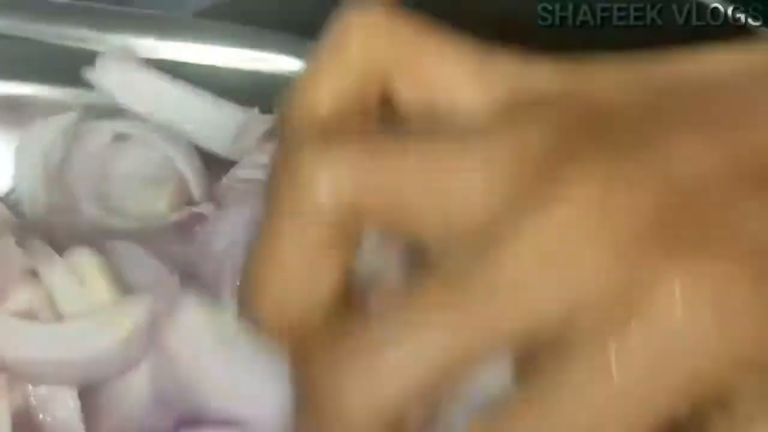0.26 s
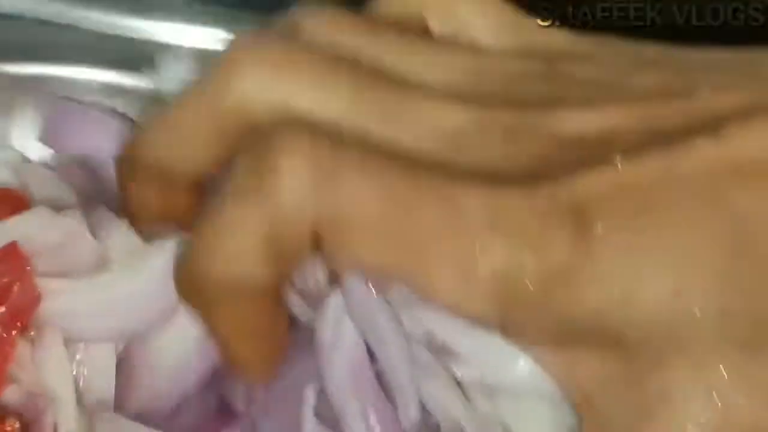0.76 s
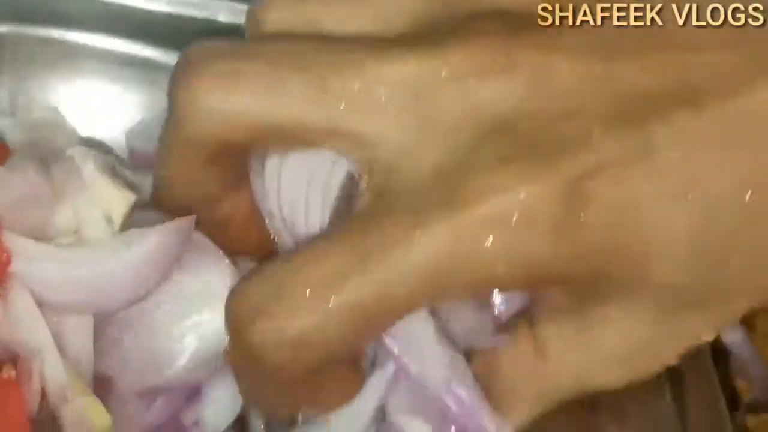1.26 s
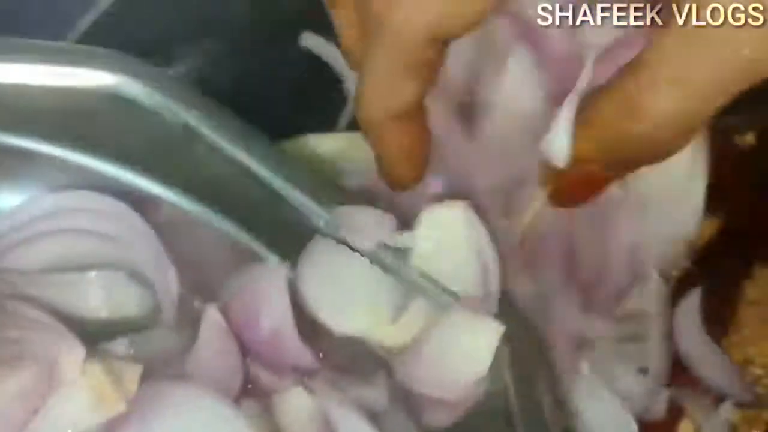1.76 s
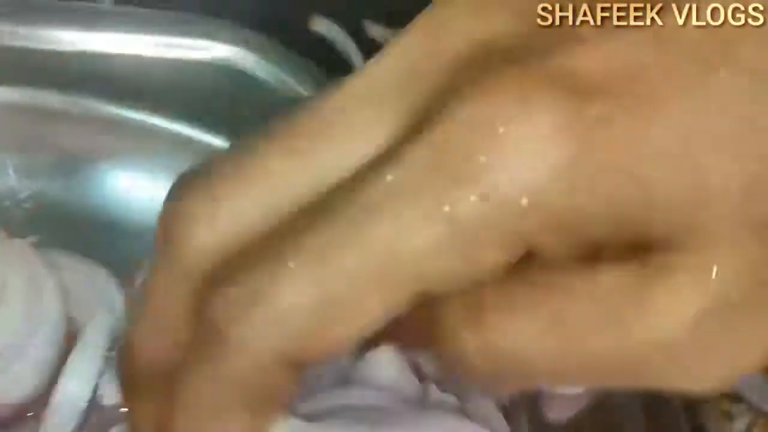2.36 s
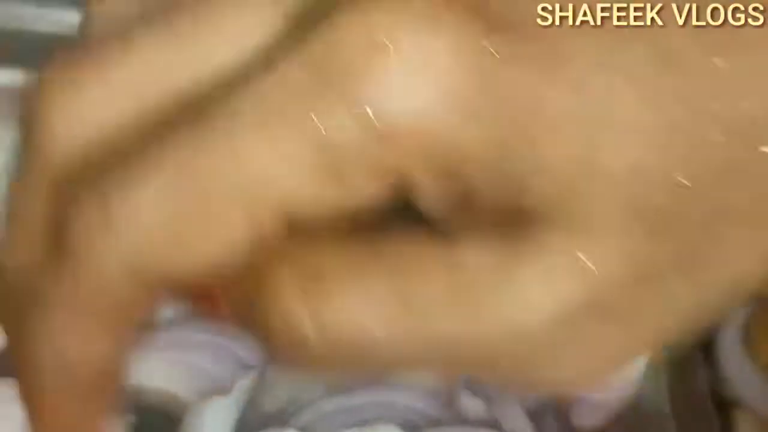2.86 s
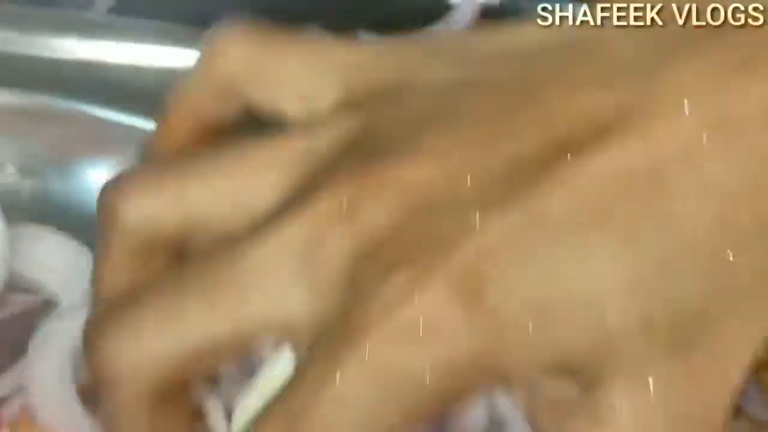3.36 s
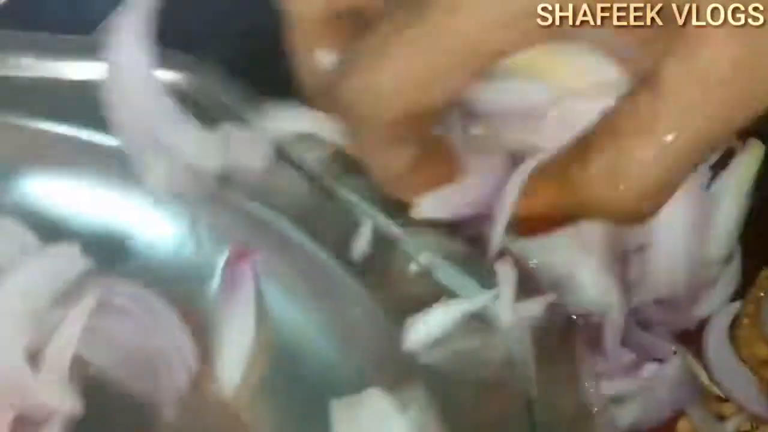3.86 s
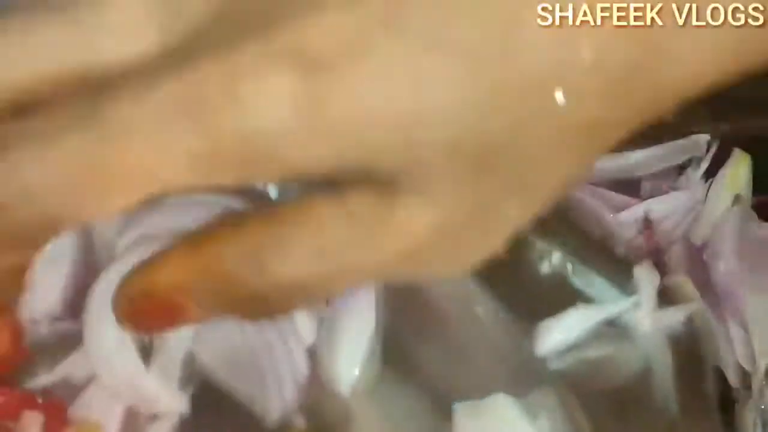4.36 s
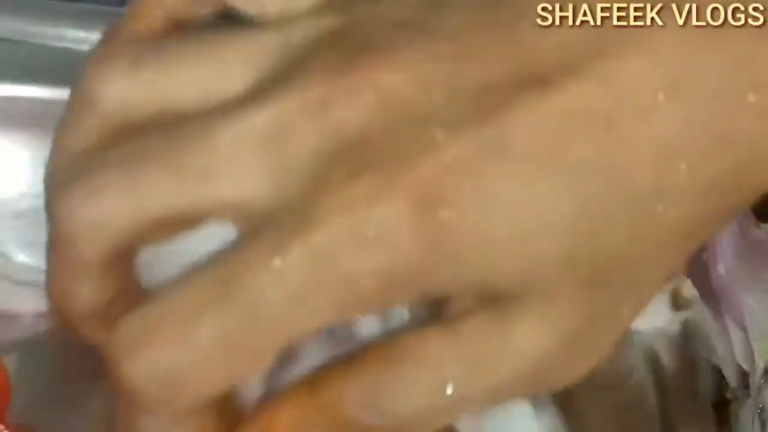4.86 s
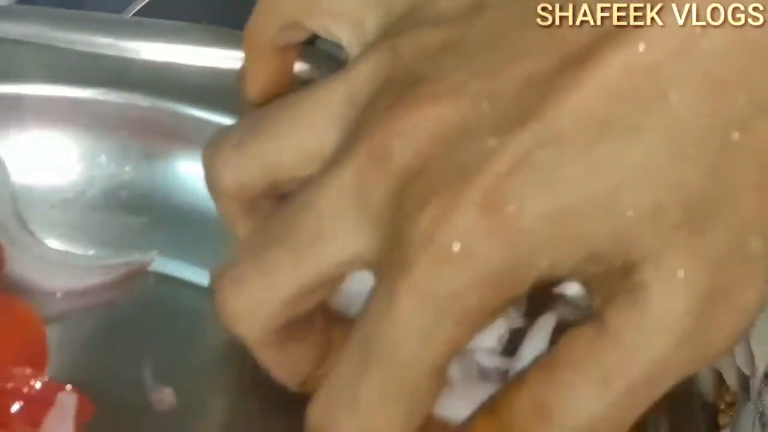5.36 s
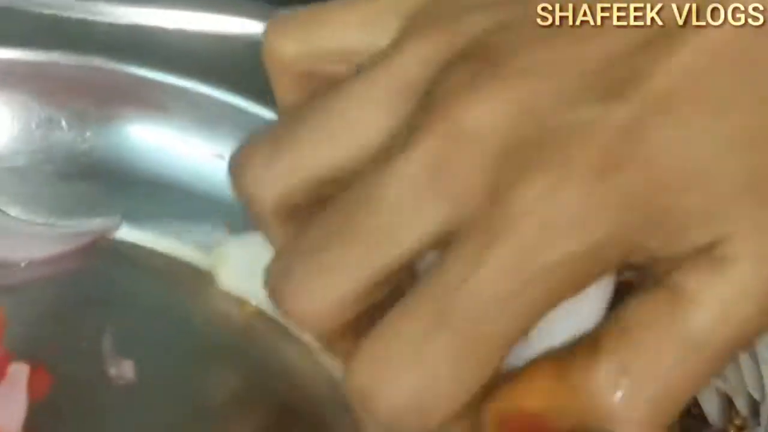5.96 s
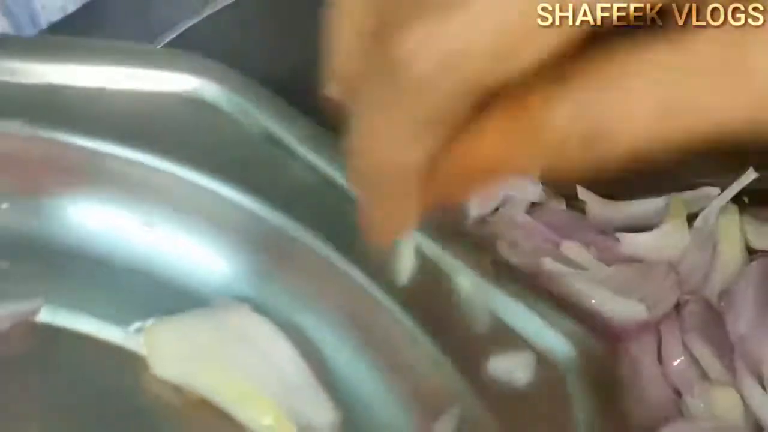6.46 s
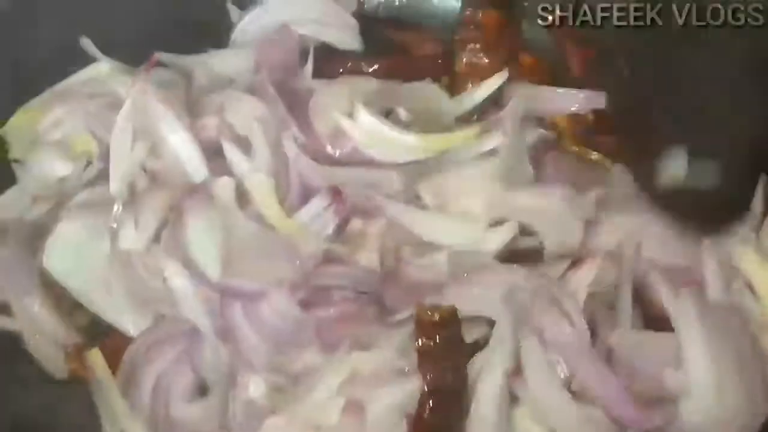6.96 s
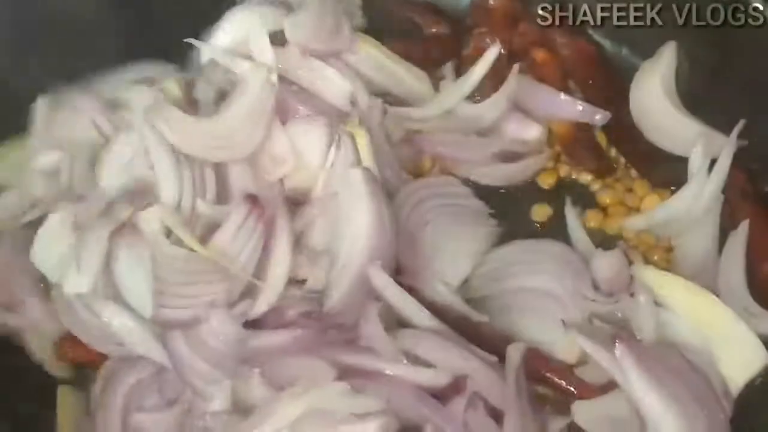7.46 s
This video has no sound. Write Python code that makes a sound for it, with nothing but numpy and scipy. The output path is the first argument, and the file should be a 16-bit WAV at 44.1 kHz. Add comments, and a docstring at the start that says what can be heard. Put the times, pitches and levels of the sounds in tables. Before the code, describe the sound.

Freshly sliced wet onions sizzle loudly in hot oil, crackling, spitting and popping close by, swelling with handfuls and ending with a knock on the microphone.

```python
"""Sliced onions fry in hot oil in a steel pan, close to a two-port microphone, in a small kitchen.
From the start steam bubbles fizz, crackle and burble, wet slices spit and pop, and a faint hum soon fades out.
The frying swells with each handful, and dull thuds come from the tray where a hand gathers slices.
Near the end the microphone moves in over the pan: rumble and a drone rise and the sizzle leans left.
The last slices land and seethe; then a finger knocks the right port and the sizzle briefly dips."""
import sys
import numpy as np
from scipy import signal
from scipy.fft import rfft, irfft, next_fast_len
from scipy.io import wavfile

SR = 44100
rng = np.random.default_rng(int(sys.argv[2]) if len(sys.argv) > 2 else 0)


def inscribe(sig):
    """Save sig as 16-bit PCM at rate SR to the path in sys.argv[1].

    A 1-D sig is mono; a 2-D sig holds one channel per row.
    Samples are clipped to [-1, 1] before scaling.
    """
    pcm = np.round(np.clip(np.atleast_2d(sig).T, -1, 1) * 32767)
    wavfile.write(sys.argv[1], SR, pcm.astype(np.int16))


N = 339481
TIME = np.arange(N) / SR
CUTOFF_HZ = 15470   # top of the microphone's range


# The frying in the pan, swelling with each handful and cooling between; each layer adds its own trim.
# Each row: time in seconds, fizz level in dB, crackle level in dB, bubbling level in dB.
FRYING_LEVELS = [(0.0, -18.5, -23.5, -34), (0.1, -19, -24.5, -35.5), (0.22, -18.5, -23, -35),
                 (0.47, -19.5, -26, -38.5), (0.76, -19, -24.5, -36.5), (0.89, -22, -28, -39.5),
                 (1.3, -21.5, -26.5, -37), (1.9, -22.5, -29.5, -41.5), (2.35, -22, -26.5, -37.5),
                 (2.7, -20.5, -25, -38), (2.9, -22.5, -27, -36), (3.22, -22, -24.5, -36),
                 (3.36, -23.5, -25, -37.5), (3.56, -24, -26, -36), (3.84, -23, -27.5, -37.5),
                 (3.98, -22.5, -24.5, -36), (4.3, -22.5, -24.5, -36.5), (4.47, -25.5, -24.5, -36),
                 (4.52, -24.5, -25, -37.5), (4.74, -19.5, -22.5, -34), (4.85, -23.5, -25, -35.5),
                 (5.15, -21, -23, -35.5), (5.3, -23.5, -26, -35.5), (5.5, -20, -23.5, -34),
                 (5.69, -21.5, -24, -34), (5.76, -24, -27, -35), (5.86, -21, -24.5, -35),
                 (6.17, -23.5, -26.5, -37), (6.42, -21.5, -24.5, -35), (6.57, -24, -27, -36),
                 (6.76, -24, -25, -36.5), (6.82, -20.5, -25, -39), (7.05, -19, -21.5, -34),
                 (7.28, -19, -23.5, -36.5), (7.42, -17, -21, -34), (7.7, -18, -22, -32)]


def sizzle():
    """Small bubbles fizz, middling ones crackle, large ones burble; flurries stir the large ones least."""
    fizz_db, crackle_db, bubbling_db = in_time(FRYING_LEVELS)
    activity = flurries(per_s=140, spread_db=2.5, fade_s=.004, depth=.45)
    # slower surges as wet slices settle
    activity = activity * flurries(per_s=16, spread_db=0.76, fade_s=.04, depth=.3)
    fizz = bursts(activity, low_hz=4010, high_hz=17300, per_s=8000, spread_db=3.5,
                  damping=0.36, echo_db=-2, haze_db=-3.5, alike=0)
    crackle = bursts(activity, low_hz=1320, high_hz=4940, per_s=3000, spread_db=2.5,
                     damping=0.53, echo_db=-2.5, haze_db=-7.0, alike=0)
    bubbling = bursts(np.sqrt(activity), low_hz=152, high_hz=1455, per_s=1100, spread_db=3.5,
                      damping=1.37, echo_db=-5.5, haze_db=-4.0, alike=0.34)
    fizz = from_db(fizz_db - 0.5) * fizz
    crackle = from_db(crackle_db - 0.58) * crackle
    return fizz + crackle + from_db(bubbling_db + 2.0) * bubbling


def bursts(activity, low_hz, high_hz, per_s, spread_db, damping, echo_db, haze_db, alike, count=7):
    """Bubbles of one size class ring a few cycles each, over a haze of countless tiny ones; rms 1."""
    grains = 0
    for hz in np.geomspace(low_hz, min(high_hz, CUTOFF_HZ), count):
        births = rms_one(clicks(activity * per_s / count, spread_db))
        grains = grains + new_spots(resonance(births, hz, damping * hz), echo_db)
    # alike is the share of haze power common to both ports
    alike = np.clip(alike, 0, 1)
    shared = np.sqrt(alike) * rng.standard_normal(N)
    haze = shared + np.sqrt(1 - alike) * rng.standard_normal((2, N))
    haze = np.sqrt(activity) * rms_one(band(haze, low_hz, high_hz))
    grains = rms_one(band(grains, low_hz, high_hz))
    return rms_one(pan_and_ports(grains + from_db(haze_db) * haze))


def flurries(per_s, spread_db, fade_s, depth, limit=5):
    """Droplets flash to steam: activity jumps, up to a limit, and dies away again; mean near 1."""
    kicks = fading(np.abs(clicks(per_s, spread_db)), fade_s)
    surge = limit * np.tanh(kicks / kicks.mean() / limit)
    return (1 + depth * surge) / (1 + depth)


def last_handful(level_db):
    """The last wet slices hit the oil and seethe in a dense, fierce crackle of small bubbles."""
    landing_s, landing_takes_s = 6.775, .03
    fizz_db = in_time(FRYING_LEVELS)[0]
    activity = flurries(per_s=200, spread_db=2, fade_s=.003, depth=.5)
    seethe = bursts(activity, low_hz=5460, high_hz=9400, per_s=2500, spread_db=3,
                    damping=0.19, echo_db=-5, haze_db=-8, alike=0, count=4)
    return ramp(landing_s, landing_takes_s) * from_db(fizz_db + level_db) * seethe


# Water meeting the oil at spots about the pan; the levels are relative, before spits() trims them.
# Each row: start in seconds, treble level in dB, body level in dB, opening crack over the spray in dB.
SPIT_EVENTS = [(0.076, -25, -27, 1), (0.2474, -35, -21, 3), (0.301, -28, -28, 2), (0.357, -26, -30, 0),
               (0.5282, -25.5, -30, 3), (0.631, -27, -33, 2), (0.7158, -25, -28, 2), (0.733, -26, -31, 2),
               (0.818, -28, -33, 2), (0.9327, -24.5, -30, -1), (1.034, -29, -31, 2), (1.089, -27.5, -26, 3),
               (1.2053, -28.5, -28, 4), (1.242, -27.5, -38, 6), (1.291, -29.5, -38, 1),
               (1.3618, -29, -37, 3), (1.456, -34, -32, 1), (1.491, -29, -28, 4), (1.62, -28.5, -42, 0),
               (1.785, -39, -35, 4), (1.9904, -28, -35, 5), (2.121, -33, -31, 0), (2.266, -39, -28, 0),
               (2.5192, -24.5, -28, 6), (2.5733, -25.5, -38, 0), (2.6853, -30, -25, 3),
               (2.9263, -24, -29, 8), (3.168, -31, -26, 4), (3.186, -28, -36, 0), (3.2307, -23, -30, 1),
               (3.740, -27, -27.5, -2), (3.9404, -26, -31, 3), (4.0796, -26.5, -33, 6),
               (4.1051, -26, -27, 3), (4.1822, -30, -34, 8), (4.246, -29, -33, 3), (4.458, -27.5, -34, 6),
               (4.476, -33, -27.5, -1), (4.575, -23.5, -28, 0), (4.6553, -27, -29, -7),
               (4.778, -25, -29, 12), (4.9082, -29, -26, 8), (5.015, -32, -38, 5), (5.168, -30, -31, 0),
               (5.2318, -28, -28, 4), (5.3598, -29, -30, 8), (5.4271, -28, -32, 1), (5.506, -27.5, -24, 2),
               (5.700, -25, -30, 4), (5.7722, -26.5, -31, 10), (5.8608, -29.5, -37, 10),
               (6.0896, -27, -32, 3), (6.264, -30, -30, 4), (6.348, -27, -35, 0), (6.5152, -25, -36, 7),
               (6.5989, -26.5, -26, -1), (6.727, -38, -32, 6), (6.7802, -23, -26, -3),
               (6.8064, -24, -33, 6), (7.3637, -30, -30, -2), (7.4232, -25, -34, 0)]


def spits(treble_db, body_db, crack_db, crack_s, grain_db, echo_db):
    """A sharp crack, then a spray of tiny bursts that holds briefly and dies."""
    hold_s, t60_s = 0.016, .09
    out, t = np.zeros((2, N)), TIME[:SR // 4]
    fade = from_db(-60 * np.maximum(t - hold_s, 0) / t60_s)
    for s, high_db, low_db, snap_db in SPIT_EVENTS:
        sizes = from_db(grain_db * rng.standard_normal(len(t)))
        grains = rms_one(rng.standard_normal(len(t)) * sizes)
        crack = from_db(snap_db + crack_db) * np.exp(-(t / crack_s) ** 2)
        spray = grains * (fade + crack)
        treble = from_db(high_db + treble_db) * band(spray, 3500, 9700, order=1)
        body = from_db(low_db + body_db) * band(spray, 830, 4300, order=3)
        add(out, s, from_spot(treble + body, echo_db))
    return pan_and_ports(out)


# Echoes of a pop off the nearby pan walls. Each row: delay in seconds, level in dB against the pop.
POP_WALL_ECHOES = [(.0022, -7), (.0038, -2.5)]
# Single large bubbles about the pan, before the level trim, the pan's path and its resonances.
# Each row: start in seconds, peak level in dB, pitch in Hz.
POP_EVENTS = [(0.2485, -11, 1300), (1.291, -18, 1000), (1.517, -19, 1000), (1.961, -19, 1200),
              (2.927, -17, 1100), (3.273, -9.5, 1500), (3.409, -19, 850), (3.517, -8.5, 1520),
              (3.741, -16, 1300), (3.9412, -13, 1700), (3.974, -16, 1200), (4.246, -15, 1100),
              (4.476, -15, 1200), (4.7782, -9.5, 1700), (5.17, -14, 1990), (5.231, -15, 1510),
              (5.634, -17, 1100), (5.731, -14.5, 1500), (5.7722, -14, 1500), (6.092, -15, 1400),
              (6.374, -14.5, 1200), (6.427, -14.5, 1200), (6.7269, -9, 1660), (7.335, -15, 1100)]


def pops(level_db, damping, echo_db):
    """A large bubble collapses in one hollow, quickly damped swing, thrown back by the walls of the pan."""
    out, collapse = np.zeros((2, N)), signal.unit_impulse(SR // 20)
    for delay_s, db in POP_WALL_ECHOES:
        collapse[int(delay_s * SR)] += from_db(db)
    for s, peak_db, hz in POP_EVENTS:
        note = band(resonance(collapse, hz, damping * hz), 616, 2500, order=3)
        note = from_db(peak_db + level_db) * note / np.abs(note).max()
        add(out, s, from_spot(note, echo_db))
    return lift(out, PAN_MODES)


def plips(level_db, per_s, spread_db, damping, count=4):
    """Larger bubbles burst singly near the microphone, more strongly as the bubbling grows."""
    bubbling_db = in_time(FRYING_LEVELS)[2]
    out = 0
    for hz in np.geomspace(1000, 1800, count):
        bubbles = resonance(clicks(per_s / count, spread_db), hz, damping * hz)
        out = out + new_spots(bubbles, echo_db=-10.0)
    return from_db(bubbling_db + level_db) * rms_one(lift(band(out, 750, 2700), PAN_MODES))


def ticks(level_db, per_s, spread_db, fade_s, echo_db):
    """Thin films of oil tear on top of the slices: dry, sharp little crackles, some bright and some dull."""
    fizz_db, crackle_db, _ = in_time(FRYING_LEVELS)
    out = 0
    for db, low_hz, high_hz in (fizz_db - 3.5, 3200, 15000), (crackle_db + 1, 1100, 6000):
        tears = fading(np.abs(clicks(per_s, spread_db)), fade_s)
        snaps = band(np.tanh(tears / 3) * rng.standard_normal(N), low_hz, high_hz, order=1)
        out = out + from_db(db + level_db) * rms_one(pan_and_ports(new_spots(snaps, echo_db)))
    return out


# Colour of the frying oil heard close by. Each row: frequency in Hz, level in dB per Hz.
OIL_COLOUR = [(60, -35), (150, -27.5), (280, -13), (450, -13), (650, -10.5), (1050, -7), (2000, 0.9),
              (2800, 1.5), (4000, -3.5), (4700, -8), (5400, -8.5), (6300, -9), (10500, -6), (14300, -5.5),
              (15400, -2.5)]
# Resonances of the steel pan. Each row: frequency in Hz, width in Hz, lift in dB.
PAN_MODES = [(345, 33, 5), (564, 42, 6.5), (625, 6.5, 9), (677, 26, 9), (813, 4.8, 9), (900, 23, 6),
             (1321, 21, 6), (1695, 23, 2), (1964, 100, 3.5), (2890, 48, 0)]
# Ringing of the microphone ports, left then right. Each row: frequency in Hz, width in Hz, lift in dB.
PORT_MODES = [(6730, 1700, 6.5), (7470, 1520, 12)]
# Shading between the two ports. Each row: frequency in Hz, left minus right in dB.
PORT_SHADING = [(100, 7), (700, -5), (1300, -4.5), (2000, 1.5), (4000, -2), (5500, 2.5), (8800, 0),
                (11500, 1.5), (13500, -1.5), (15400, 5.5)]


def pan_and_ports(x):
    """Bursts take the colour of the oil, ring the pan and then the ports."""
    x = lift(colour(x, OIL_COLOUR), PAN_MODES)
    ports = zip(x, PORT_MODES, (.5, -.5))
    return np.array([colour(lift(one, [mode]), PORT_SHADING, share) for one, mode, share in ports])


def paths(echo_db, count=2400):
    """From one spot in the pan to both ports: direct sound, quick echoes off the pan wall, then the kitchen."""
    port_lag_s = .00031
    rays = [(np.array([0.]), np.array([1.]))]
    # pan wall, then kitchen: 60 dB decay time in s, level in dB, number of echoes
    for t60, db, number in (.025, 0.5, count // 8), (.25, 1.5, count):
        delay = rng.random(number) * t60
        gain = rng.standard_normal(number) * from_db(-60 * delay / t60)
        rays.append((delay, from_db(db + echo_db) * gain / np.linalg.norm(gain)))
    delay, gain = np.hstack(rays)
    # every ray comes from its own direction, so the ports agree only in the bass
    lag = rng.uniform(-.5, .5, len(delay)) * port_lag_s
    arrivals = [((delay + port_lag_s / 2 + side * lag) * SR).astype(int) for side in (1, -1)]
    responses = [np.bincount(at, gain, SR)[:SR // 4] for at in arrivals]
    return np.array(responses) / np.linalg.norm(gain)


def from_spot(x, echo_db=0):
    """A sound made at one random spot in the pan, in stereo; lower echo_db sounds nearer."""
    return signal.fftconvolve(x[None], paths(echo_db), axes=1)[:, :N]


def new_spots(x, echo_db, count=12):
    """Bubbles rise at ever new spots: each of twelve equal stretches of time gets a new random path."""
    out = np.zeros((2, N))
    for at in np.array_split(np.arange(N), count):
        add(out, at[0] / SR, from_spot(x[at], echo_db))
    return out


def knock(level_db, hz, width_hz, tick_db, tick_hz, snap_db, snap_hz):
    """A finger bumps the right port: a tick in the case, a snap and one dead swing of pressure."""
    knock_s = 7.5005
    out, t = np.zeros((2, N)), TIME[:SR // 20]
    thud = from_db(level_db) * np.sin(2 * np.pi * hz * t) * np.exp(-np.pi * width_hz * t)
    snap = -from_db(snap_db) * np.sin(2 * np.pi * snap_hz * t) * np.exp(-2 * snap_hz * t)
    tick = from_db(tick_db) * np.sin(2 * np.pi * tick_hz * t) * np.exp(-t / .0008)
    # the case carries the tick to both ports
    add(out, knock_s, np.array([tick, tick + band(thud + snap, 100, 1400, order=2)]))
    return out


# The hand bumping the tray as it gathers slices; levels are before the trim and the thud's envelope.
# Each row: start in seconds, level in dB, pitch in Hz.
TRAY_BUMPS = [(2.132, -35, 300), (3.345, -44, 106), (4.75, -43, 105), (6.235, -38, 240)]


def bumps(level_db, fade_s, rise_s):
    """Soft flesh on a loaded tray gives dull, short thuds."""
    out, t = np.zeros((2, N)), TIME[:SR // 5]
    for s, bump_db, hz in TRAY_BUMPS:
        thud = np.sin(2 * np.pi * hz * t) * np.exp(-t / fade_s) * (1 - np.exp(-t / rise_s))
        add(out, s, from_db(bump_db + level_db) * thud[None])
    return out


# Rumble of stove and hand at the microphone. Each row: frequency in Hz, relative level in dB per Hz.
RUMBLE_COLOUR = [(20, -23), (45, -10), (70, -9), (105, 0), (150, -7.5), (250, -7), (600, -35)]


def rumble(moved):
    """Low noise, nearly alike at both ports, comes in surges and grows as the hand moves."""
    still_db, moving_db = -60.5, -56
    air = rng.standard_normal(N) + from_db(-12) * rng.standard_normal((2, N))
    surges = np.sqrt(flurries(per_s=13, spread_db=4, fade_s=.06, depth=0.56))
    level_db = still_db + moved * (moving_db - still_db)
    return from_db(level_db) * rms_one(colour(air, RUMBLE_COLOUR) * surges)


# A low drone over the stove. Each row: frequency in Hz, level in dB of the slightly unsteady tone.
STOVE_DRONE = [(96.9, -58.5), (118.4, -59)]


def drone(width_hz):
    """Low tones, each a steady sine plus a narrow band of noise that makes it slightly unsteady."""
    out = 0
    for hz, db in STOVE_DRONE:
        waver = rms_one(resonance(rng.standard_normal(N), hz, width_hz))
        out = out + from_db(db) * rms_one(np.sin(2 * np.pi * hz * TIME) + waver / 2)
    return out


def hum(waver_db, waver_hz):
    """A faint, wavering appliance tone that holds, then fades."""
    hz, steady_db, hold_s, fade_db_per_s = 288, -57, 1.97, 28
    waver = rms_one(resonance(rng.standard_normal(N), hz, waver_hz))
    level_db = steady_db - fade_db_per_s * np.maximum(TIME - hold_s, 0)
    return from_db(level_db) * (rms_one(np.sin(2 * np.pi * hz * TIME)) + from_db(waver_db) * waver)


def from_db(db):
    """Decibels to gain."""
    return 10 ** (np.asarray(db) / 20)


def rms_one(x):
    """Scale to unit rms."""
    return x / np.sqrt(np.mean(x ** 2) + 1e-20)


def in_time(rows):
    """Each column of a curve at every sample."""
    s, *columns = np.transpose(rows)
    return [np.interp(TIME, s, c) for c in columns]


def ramp(start_s, length_s):
    """Rises evenly from 0 to 1 and stays there."""
    return np.clip((TIME - start_s) / max(length_s, .01), 0, 1)


def clicks(per_s, spread_db):
    """Random clicks, many small and a few large."""
    at = np.flatnonzero(rng.random(N) < per_s / SR)
    size_db = spread_db * np.minimum(rng.exponential(1, len(at)), 6)
    out = np.zeros(N)
    out[at] = from_db(size_db) * rng.choice([-1, 1], len(at))
    return out


def fading(kicks, fade_s):
    """Each kick dies away exponentially."""
    return signal.lfilter([1], [1, -np.exp(-1 / (fade_s * SR))], kicks + 1e-18)


def colour(x, points, share=1):
    """Filter by a smooth spectrum of (Hz, dB) points, scaled in dB by share."""
    size = next_fast_len(N + 8192)
    hz, db = np.transpose(points)
    bins = np.maximum(np.fft.rfftfreq(size, 1 / SR), 1)
    gain = from_db(share * np.interp(np.log(bins), np.log(hz), db))
    return irfft(rfft(x, size) * gain, size)[..., :N]


def band(x, low_hz, high_hz, order=3):
    """Causal band-pass."""
    edges = [low_hz, min(high_hz, SR / 2 - 2000)]
    return signal.sosfilt(signal.butter(order, edges, "band", fs=SR, output="sos"), x + 1e-18)


def resonance(x, hz, width_hz):
    """Two-pole resonance, gain about 1 on top."""
    r = np.exp(-np.pi * width_hz / SR)
    zeros = np.array([1, 0, -1]) * (1 - r * r) / 2
    poles = [1, -2 * r * np.cos(2 * np.pi * hz / SR), r * r]
    return signal.lfilter(zeros, poles, x + 1e-18)


def lift(x, modes):
    """Resonances stand out of a sound."""
    return x + sum((from_db(db) - 1) * resonance(x, hz, width) for hz, width, db in modes)


def add(out, s, sound):
    """Mix a sound in at a time."""
    at = int(s * SR)
    out[:, at:at + sound.shape[1]] += sound[:, :N - at]


def scene():
    """The pan close by, and under it the rumble, the drone, the hum and the sounds of the hand."""
    moved = ramp(start_s=6.7, length_s=0.24)   # the microphone moves in over the pan
    oil = sizzle() + plips(level_db=-4, per_s=60, spread_db=1.8, damping=0.54)
    oil = oil + ticks(level_db=-5, per_s=160, spread_db=2.0, fade_s=.0008, echo_db=-7)
    oil = oil + pops(level_db=1.5, damping=.7, echo_db=-8)
    oil = oil + spits(treble_db=9.3, body_db=6.0, crack_db=1.3, crack_s=0.0039, grain_db=3.5, echo_db=-4.5)
    still_pan_db, moved_pan_db = 2.5, 5   # left minus right
    pan_db = still_pan_db + moved * (moved_pan_db - still_pan_db)
    oil = oil * from_db(pan_db * np.array([[.5], [-.5]])) + last_handful(level_db=-4.5)
    # all the frying dips briefly around the knock
    dip_s, dip_width_s, dip_db = 7.555, 0.063, -7.5
    oil = oil * from_db(dip_db * np.exp(-((TIME - dip_s) / dip_width_s) ** 2))
    hand = bumps(level_db=3.5, fade_s=0.0096, rise_s=0.0026)
    hand = hand + knock(level_db=3.0, hz=318, width_hz=270, tick_db=-5.5, tick_hz=8350,
                        snap_db=-1.0, snap_hz=800)
    return oil + hand + rumble(moved) + moved * drone(width_hz=5) + hum(waver_db=3, waver_hz=60)


def record(dry):
    """The microphone clips the highest peaks at full scale, then the top is cut steeply."""
    top_cut = signal.ellip(12, .2, 80, CUTOFF_HZ, fs=SR, output="sos")
    return signal.sosfilt(top_cut, np.clip(dry, -1, 1))


dry = scene()
out = record(dry)
inscribe(out)
```